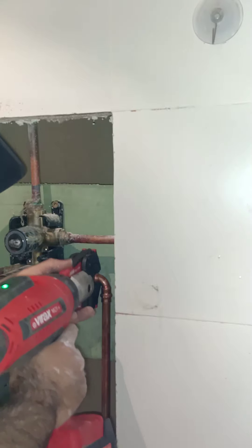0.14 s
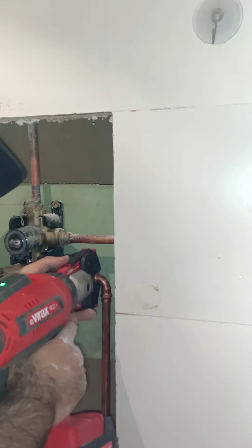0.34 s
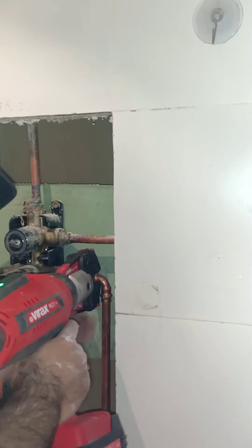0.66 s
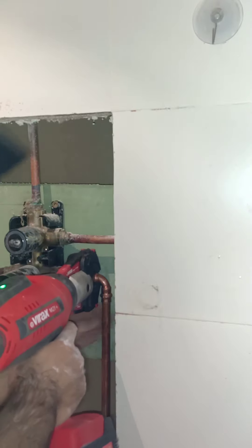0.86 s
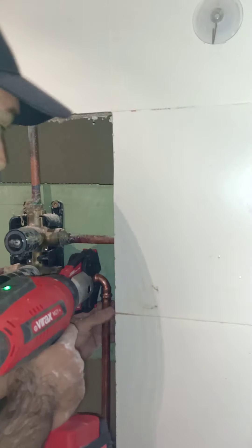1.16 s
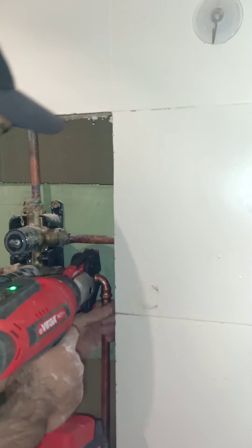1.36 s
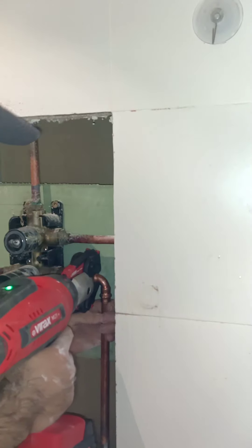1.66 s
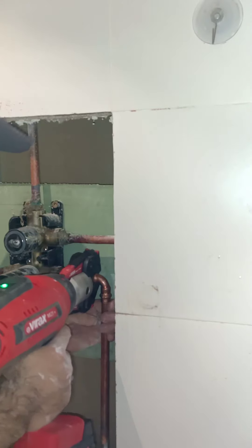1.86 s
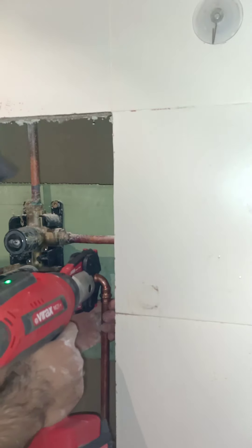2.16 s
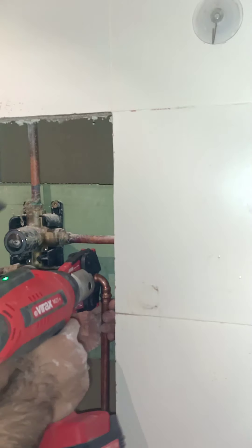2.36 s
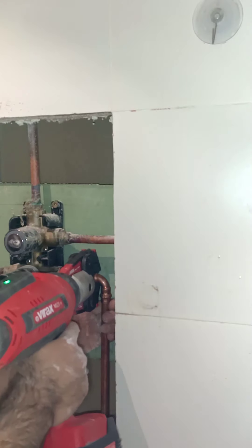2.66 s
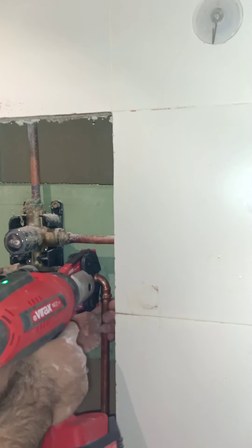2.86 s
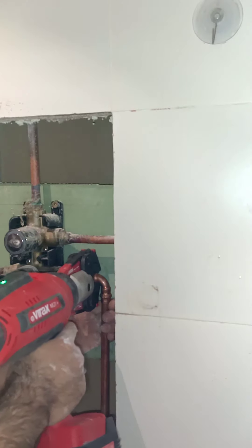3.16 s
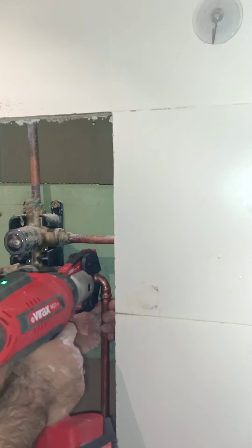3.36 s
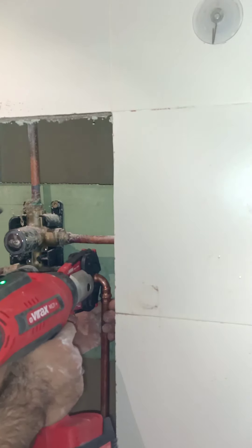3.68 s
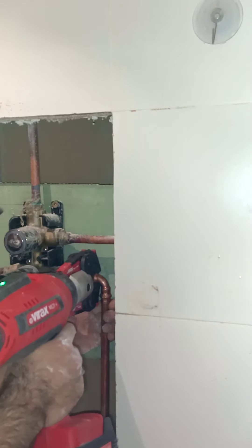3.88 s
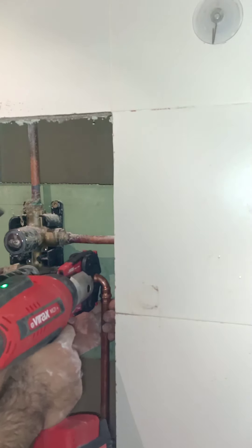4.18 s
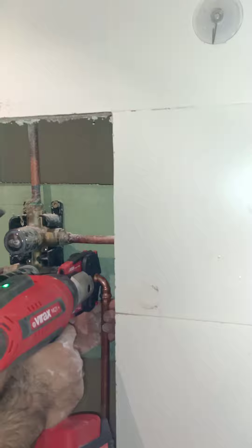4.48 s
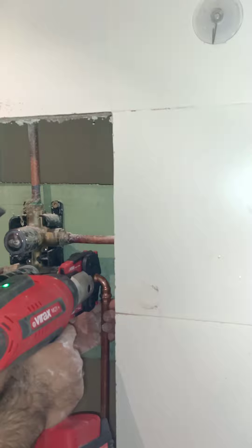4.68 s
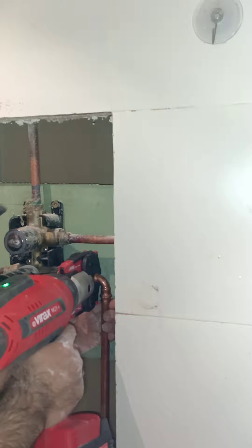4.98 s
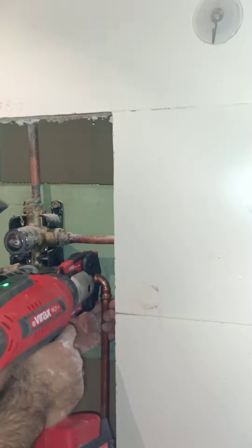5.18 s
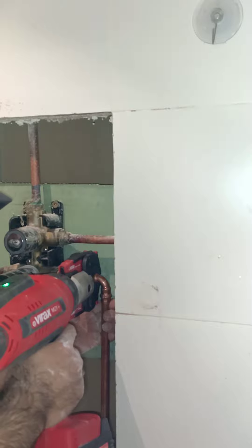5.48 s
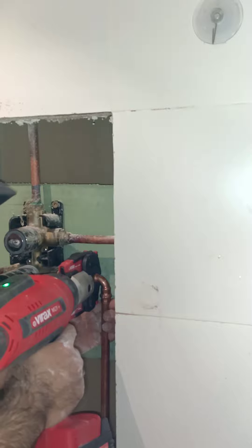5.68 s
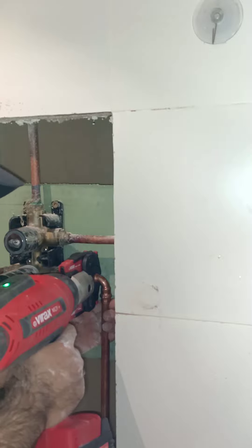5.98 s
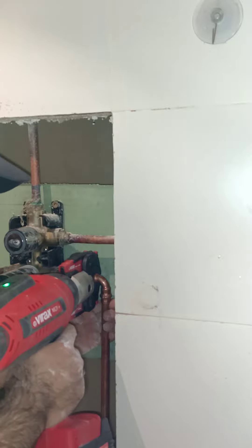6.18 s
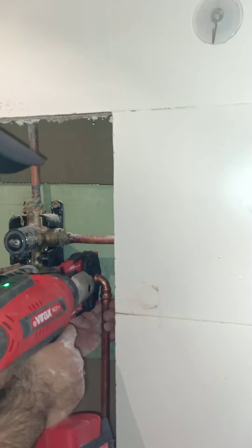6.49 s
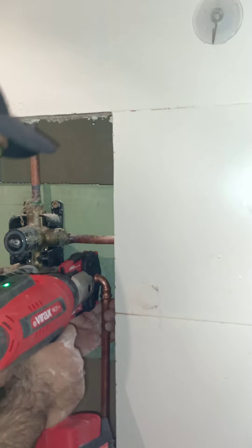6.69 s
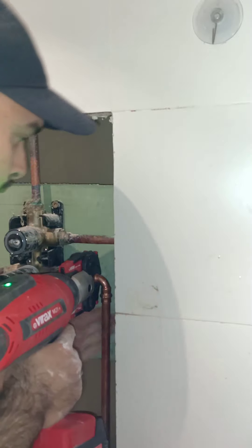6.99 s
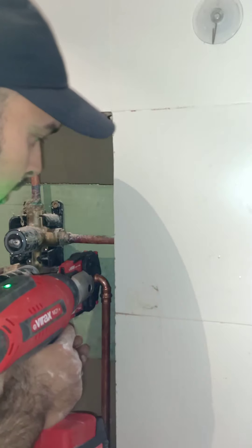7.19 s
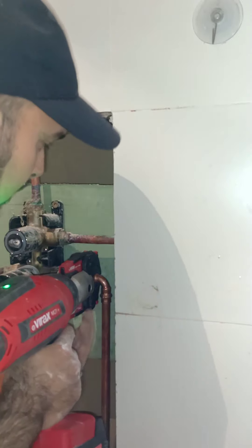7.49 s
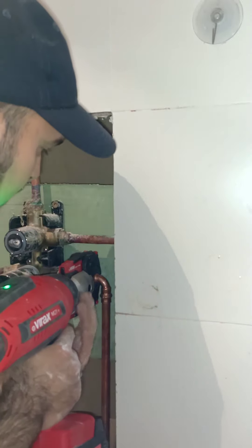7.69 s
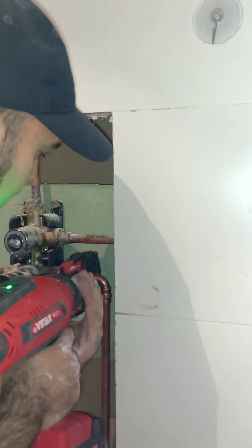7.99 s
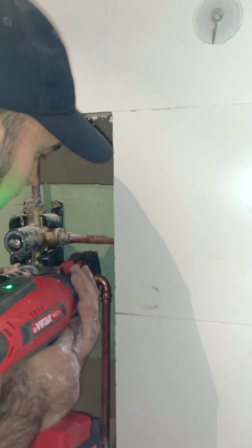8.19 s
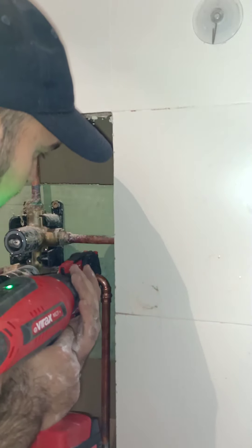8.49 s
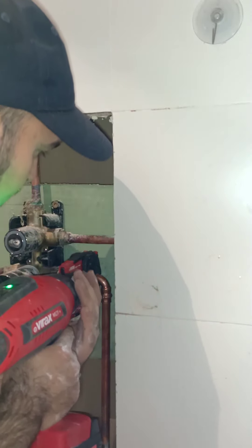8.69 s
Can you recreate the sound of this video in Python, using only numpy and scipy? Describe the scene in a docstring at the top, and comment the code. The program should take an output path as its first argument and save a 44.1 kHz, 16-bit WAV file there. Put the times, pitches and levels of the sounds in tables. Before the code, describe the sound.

For the first three seconds someone shifts about close to the microphone in a small tiled room, with quiet cloth rustle, scrapes, dull bumps and a few clicks from a tool's jaws. The strongest thump comes at about 1.3 seconds. At 2.9 seconds a trigger clicks and a battery press tool spins up to a loud, high whine over a rush of gears. From about 4 seconds the pitch sags and wavers as the jaws crimp a copper pipe fitting, and a low rumble carries through the wall. At 5.9 seconds the motor stalls for an instant, then reverses and quickly climbs back to a high whine. From about 7.3 seconds it slows to a lower whir with a thin steady tone, still running at the end, near 9 seconds.

```python
"""Battery press tool in a small tiled room

A phone stands close to the work. Hands and knees shuffle and bump, the jaws and trigger click, then the
motor spins up, sags as the jaws bite, stalls, runs back and slows. Rotor slots and gear teeth whine over
the rush of gears and brushes, and the tool's shake carries through pipe and wall."""
import sys
import numpy as np
from scipy import signal
from scipy.fft import rfft, irfft
from scipy.io import wavfile
from scipy.ndimage import uniform_filter1d

SR = 44100
rng = np.random.default_rng(int(sys.argv[2]) if len(sys.argv) > 2 else 0)


def generate_wav(sig):
    """Save sig (samples, or channels by samples) to the path in sys.argv[1] as 16-bit PCM at SR."""
    pcm = np.round(np.clip(np.atleast_2d(sig).T, -1, 1) * 32767).astype(np.int16)
    wavfile.write(sys.argv[1], SR, pcm)


N = 390285
TIME = np.arange(N) / SR

SLOTS = 15  # rotor slots
MESH_1, MESH_1B, MESH_2, MESH_SUM = 11.085, 11.67, 22.73, 33.8  # gear teeth met per shaft turn
START_S, UP_TO_SPEED_S, REVERSE_S = 2.915, 3.3, 5.92
FREE_HZ, RETURN_HZ = 4720, 4200  # slot tone with no load: forwards, running back
FULL_SAG = .28  # share of the speed lost at full load

# Spectrum of the room's background: frequency_hz, gain_db
ROOM_COLOUR = [(30, -14), (70, -7), (160, -13), (480, -28), (3200, -32), (4660, -12), (6000, -24),
               (7600, -38), (8500, -46), (13500, -46), (15000, -36)]
# Low resonances of the room: centre_hz, width_hz, gain_db
ROOM_MODES = [(290.7, 11, 13.5), (155, 10, 12.5), (217, 17, 14.5)]


def undb(db):
    """Decibels to gain."""
    return 10 ** (np.asarray(db) / 20)


def unit(x):
    """Scale to rms 1."""
    return x / np.sqrt(np.mean(x ** 2))


def noise(n=N):
    """White noise."""
    return rng.standard_normal(n)


def curves(table, off=-120):
    """Each column of a timed table as a curve, with the value `off` outside its span."""
    s, *columns = np.transpose(table)
    return [np.interp(TIME, s, c, off, off if s[-1] < TIME[-1] - .01 else c[-1]) for c in columns]


def bell(peak_s, half_s):
    """A smooth rise to 1 and fall around peak_s."""
    return np.exp(-((TIME - peak_s) / half_s) ** 2)


def swells(table):
    """A gain curve of overlapping bells."""
    return sum(undb(db) * bell(s, half_s) for s, db, half_s in table)


def response(f, points, peaks=()):
    """Gain in dB at frequency f: a line through the points plus resonance peaks."""
    point_hz, point_db = np.transpose(points)
    db = np.interp(np.log(f + 1), np.log(point_hz), point_db)
    return db + sum(gain / (1 + (2 * (f - hz) / width) ** 2) for hz, width, gain in peaks)


def colour(x, points, peaks=()):
    """Filter by a response and scale to rms 1."""
    gain = undb(response(np.fft.rfftfreq(N, 1 / SR), points, peaks))
    return unit(irfft(rfft(x) * gain, N))


def band(x, lo_hz, hi_hz):
    """Band-pass."""
    return signal.sosfilt(signal.butter(2, [lo_hz, hi_hz], "bandpass", fs=SR, output="sos"), x)


def walk(per_s):
    """Smooth random drift through per_s new values a second."""
    hold = int(SR / per_s)
    steps = np.repeat(rng.standard_normal(N // hold + 1), hold)
    return 1.32 * uniform_filter1d(uniform_filter1d(steps, hold), hold)[:N]


def add(out, start_s, x):
    """Mix x in at start_s."""
    i = int(start_s * SR)
    out[i:i + len(x)] += x[:N - i]


def room(x, wet_db, t60_s=0.35):
    """Direct sound plus echoes off the tiles; air and walls take their treble."""
    t = TIME[:SR // 2]
    echo = noise(len(t)) * 1000 ** (-t / t60_s) * (t > .003)
    echo = signal.sosfilt(signal.butter(2, 6500, fs=SR, output="sos"), echo)
    echo = echo / np.sqrt(np.sum(echo ** 2)) * undb(wet_db)
    echo[0] = 1
    return signal.fftconvolve(x, echo)[:N]


def room_tone(tool, halved_at_db=-45):
    """Faint background, which the phone's suppressor turns down as the tool gets loud."""
    background = colour(noise(), ROOM_COLOUR) * undb(-70 + 1.5 * walk(6))
    loudness = uniform_filter1d(abs(tool), SR // 10)
    return background / (1 + loudness / undb(halved_at_db))


def shuffle():
    """The worker settles near the phone: low rumble, scrapes, cloth and a creak."""
    # Body shifting: time_s, level_db
    shifts = [(0.0, -45.5), (0.18, -56.5), (0.74, -71.5), (1.41, -66), (1.78, -52), (2.1, -62), (2.43, -71),
              (2.92, -75)]
    # Shoes and tool scraping: peak_s, level_db, half_length_s
    scrapes = [(.03, -52.5, 0.1), (.3, -51.5, 0.055), (.97, -66.5, 0.11), (1.15, -64.5, 0.05),
               (1.33, -61, 0.053), (1.53, -63, 0.043), (1.79, -67, 0.17)]
    # Cloth rustling: peak_s, level_db, half_length_s
    rustles = [(0, -57.5, 0.078), (0.81, -76, 0.075), (0.973, -58, 0.074), (1.125, -56, 0.02),
               (1.173, -53.5, 0.03), (1.36, -62.5, 0.11), (1.6, -57, 0.12), (1.98, -55.5, 0.12),
               (2.14, -54, 0.14), (2.695, -71, 0.048)]
    # Spectrum of cloth at the microphone: frequency_hz, gain_db
    cloth_colour = [(880, -50), (1500, -25), (1690, -19), (2730, -19), (4650, -8), (6700, -15), (8100, -34),
                    (10000, -40), (12000, -48), (15600, -59), (22000, -120)]
    # Resonances in the rustle: centre_hz, width_hz, gain_db
    cloth_peaks = [(3250, 120, 8), (4610, 300, 6.5), (6240, 200, 4), (8490, 120, 9), (9600, 420, 13)]
    # One short creak: time_s, pitch_hz, level_db
    creak_path = [(.62, 404, -84), (.65, 410, -64), (.7, 435, -65), (.74, 425, -69), (.77, 398, -83)]
    rumble = unit(band(band(noise(), 40, 208), 35, 450)) * undb(curves(shifts)[0] + 2.6 * walk(25.4))
    scrape = unit(band(noise(), 290, 1350)) * swells(scrapes) * undb(1.5 * walk(40.3))
    cloth = colour(noise() * undb(1.1 * walk(120)), cloth_colour, cloth_peaks) * swells(rustles)
    creak_hz, creak_db = curves(creak_path)
    creak_phase = 2 * np.pi * np.cumsum(creak_hz) / SR
    creak = undb(creak_db + 3.7 * walk(41.5)) * np.sin(creak_phase + walk(60.3))
    return rumble + scrape + creak + cloth


def thumps():
    """Knees and tool bump floor and wall: a thud that sags in pitch, ringing modes and a rough tail."""
    # Soft blows: start_s, strength_db, pitch_hz, ring_t60_s
    blows = [(0.009, -30, 139.6, 0.54), (0.069, -34, 151.4, 0.38), (0.287, -29.5, 180, 0.43),
             (0.924, -38.5, 230, 0.28), (0.957, -32.5, 230, 0.22), (1.039, -41.5, 155, 0.48),
             (1.276, -18.5, 143.3, 0.31), (1.378, -32.5, 154, 0.43), (1.478, -40.5, 154, 0.53),
             (1.654, -27.5, 189.5, 0.67), (1.734, -29.5, 223, 0.69), (2.281, -44, 201, 0.22),
             (2.679, -44.5, 200, 0.56)]
    # Modes of floor and wall: pitch_hz, gain_db
    modes = [(82, -5), (156, 0), (215, 0), (243, -5), (270, -5.5), (296, -8), (350, -8.5), (441, -9.5),
             (497, -9), (641, -7.5), (780, -15), (870, -17), (975, -15)]
    octave_db, scatter_db = -6.5, 4  # modes far from a blow's pitch ring less; no two blows land alike
    out, t = np.zeros(N), TIME[:SR]
    phase_per_hz = 2 * np.pi * (t + 0.006 * (1 - np.exp(-t / 0.035)))
    attack = 1 - np.exp(-t / 0.0033)
    chances = rng.standard_normal((len(blows), len(modes)))
    for (start_s, db, hz, t60), scatter in zip(blows, chances):
        thud = 0.86 * np.sin(hz * phase_per_hz) * 1000 ** (-t / t60 / .45)
        ring = 0
        for (mode_hz, mode_db), chance in zip(modes, scatter):
            gain = undb(mode_db + octave_db * abs(np.log2(mode_hz / hz)) + scatter_db * chance)
            decay = 1000 ** (-t * (mode_hz / hz) ** 0.25 / t60)
            ring += gain * np.sin(mode_hz * (1 + .015 * chance) * phase_per_hz) * decay
        rough = unit(band(band(noise(SR), hz * 0.4, hz * 2.65), 50, 880))
        tail = 0.65 * rough * 1000 ** (-t / t60 / 1.19)
        add(out, start_s, 0.22 * undb(db) * (thud + ring + tail) * attack)
    return out


def clicks(top_hz=7700):
    """Jaws, latch and trigger snap, and a sliding hand ticks twice near 2 s; each is a short burst of noise
    around its own pitch."""
    # Snaps and ticks: start_s, peak_db, centre_hz, width_hz, decay_s
    snaps = [(0.235, -28, 3250, 5400, 0.0086), (0.535, -67, 2060, 500, .006),
             (1.097, -41.5, 7500, 7000, 0.004), (1.275, -35.5, 4660, 4400, 0.0097),
             (1.739, -48, 1460, 1400, 0.009), (1.931, -42, 4500, 5000, .0015),
             (2.052, -44, 4400, 1500, .002), (2.6584, -53, 5460, 3500, .004),
             (2.766, -54, 4350, 2960, 0.0045), (2.844, -34.5, 5150, 3240, 0.0083),
             (2.918, -22.5, 2120, 3180, 0.01)]
    out, t = np.zeros(N), TIME[:SR // 5]
    for start_s, db, hz, width_hz, decay_s in snaps:
        edges = max(hz - width_hz / 2, 700), hz + width_hz / 2
        burst = band(band(noise(len(t)) * np.exp(-t / decay_s), *edges), *edges)
        burst = signal.sosfilt(signal.butter(6, top_hz, fs=SR, output="sos"), burst)
        add(out, start_s, undb(db) * burst / abs(burst).max())
    return out


def wall_shake():
    """The running tool shakes pipe and wall: a deep rumble and a boom in the room's modes."""
    # Strength of the shake: time_s, deep_db, boom_db
    levels = [(2.92, -82, -72), (3.61, -84, -66), (4.3, -71, -51.5), (5.4, -69, -50.5), (6.1, -57, -45.5),
              (6.95, -60, -50), (7.9, -75, -49), (8.85, -76, -49)]
    deep_db, boom_db = curves(levels, off=-83)
    deep = unit(band(noise(), 47, 136)) * undb(deep_db + 1.2 * walk(6))
    wall = band(band(noise(), 131, 241), 135, 264)
    boom = colour(wall, ROOM_COLOUR, ROOM_MODES) * undb(boom_db + 2 * walk(3.66))
    return (deep + boom) * (TIME > START_S)


def speed_control(pitch_hz=1990):
    """The speed control chops the current: a thin tone that keeps its pitch at any motor speed."""
    # Strength of the tone: time_s, level_db
    levels = [(2.92, -55), (4, -53.5), (5.9, -45), (6, -42), (6.15, -48), (7.4, -49), (7.8, -37),
              (8.85, -35.5)]
    gain = undb(curves(levels)[0] + 1.8 * walk(20))
    return gain * np.sqrt(2) * np.sin(2 * np.pi * pitch_hz * TIME + .9 * walk(17))


def gear_rush(turns):
    """Gear noise and brush fizz pulse once a turn over a low growl, all heard through the housing."""
    # Strength of the rush, with growl and fizz relative to it: time_s, level_db, growl_db, fizz_db
    levels = [(2.915, -33.5, -22, -22), (3, -27, -10.5, -17), (3.1, -24.5, -10.5, -12),
              (3.27, -25.5, -11, -17), (4.2, -25, -10.5, -11), (4.6, -24.5, -10, -15),
              (5.885, -23, -11.5, -16), (5.905, -38, -3, -34), (5.94, -26.5, -1, -35),
              (5.97, -27.5, -2.5, -19), (6.1, -26.5, -6, -11), (6.41, -25.5, -7, -19), (7.27, -24, -9, -17),
              (7.7, -28, -8, -16), (8.85, -28, -9.5, -15)]
    # Spectrum of the rush: frequency_hz, gain_db
    spectrum = [(60, -44), (200, -13.5), (600, -11), (1400, -2), (2500, -5.5), (4700, 1), (6700, -2),
                (8400, -22), (12200, -27), (14000, -18), (15800, -16)]
    # Housing resonances and dips: centre_hz, width_hz, gain_db
    housing = [(1062, 71, 8.5), (1180, 230, -12), (1497, 27, 4.5), (1680, 197, -6.5), (4550, 620, 6),
               (5230, 470, 2.5), (10110, 1460, 8), (14950, 470, 14), (15750, 210, 13), (878, 51, 7),
               (926.5, 31, 7)]
    level_db, growl_db, fizz_db = curves(levels)
    beat = np.cos(2 * np.pi * turns)
    gears = colour(noise() * (1 + 0.16 * beat), spectrum, housing)
    # Brushes spark unevenly at the bars.
    sparks = noise() * (1 + .5 * beat) * undb(1.4 * walk(13) + 2.2 * walk(40) + 2.6 * walk(400))
    fizz = unit(band(colour(sparks, spectrum, housing), 6500, 18000))
    gear_bass = signal.sosfiltfilt(signal.butter(2, 1300, fs=SR, output="sos"), gears)
    rush = unit(band(gears - gear_bass, 250, 10640))
    growl = unit(band(band(colour(noise(), spectrum, housing), 227, 1540), 230, 4800))
    mix = rush * undb(1.2 * walk(12)) + growl * undb(growl_db + walk(10)) + fizz * undb(fizz_db)
    return mix * undb(level_db)


def rotor():
    """The rotor trembles more under strain. Returns slot pitch, strain (0 to 1) and shaft turns."""
    # Motor speed, heard as the slot tone: time_s, pitch_hz
    speed = [(2.92, 804), (2.96, 1276), (3.0, 1990), (3.1, 2846), (3.15, 3716), (3.2, 4220), (3.26, 4520),
             (3.36, 4673), (3.6, 4724), (3.92, 4710), (4.15, 4412), (4.4, 4187), (4.57, 3416), (4.68, 3375),
             (4.87, 3200), (5.1, 3576), (5.25, 3786), (5.33, 3668), (5.42, 3730), (5.57, 3650),
             (5.67, 3480), (5.76, 3530), (5.862, 3427), (5.89, 2352), (5.92, 394.5), (5.96, 2453),
             (6.11, 3314), (6.15, 3855), (6.2, 4110), (6.28, 4350), (6.62, 4386), (6.67, 4326),
             (6.85, 4317), (6.97, 4250), (7.15, 4238), (7.31, 4260), (7.47, 3452), (7.57, 3057),
             (7.7, 2717), (7.8, 2510), (7.97, 2372), (8.3, 2293), (8.85, 2367)]
    slot_hz = curves(speed, off=0)[0]
    strain = np.clip((1 - slot_hz / FREE_HZ) / FULL_SAG, 0, 1) * (TIME < REVERSE_S)
    trembling_hz = slot_hz * (1 + (.0015 + .004 * strain) * walk(45))
    return slot_hz, strain, np.cumsum(trembling_hz) / SLOTS / SR


def whine(slot_hz, strain, turns):
    """Slot and gear tones locked to the shaft; their levels follow the load and the resonances crossed."""
    # Tones: cycles_per_turn, press_db, return_db, full_load_gain_db, waver_db, flicker_db, play_rad
    tones = [(1, -31.5, -27.5, 1, 3, 1.5, 0.23), (5, -31, -22, -0.5, 0.3, 1.5, 0.43),
             (10, -35.5, -49, -5, 0.5, 3.5, -0.1), (SLOTS, -29, -27.5, 0.5, 0.41, 1.8, 0.19),
             (2 * SLOTS, -45, -35.5, -1, 0.91, 2.3, 0.1499), (40, -54, -45.5, 1, 5.5, 6, -0.3),
             (3 * SLOTS, -45, -39, 0, 2, 2, .2), (MESH_1, -33, -38.5, 13.1, 1.5, 2.2, 0.28),
             (MESH_1B, -41.5, -47, 13, 3, 3, 0.63), (2 * MESH_1, -35.5, -43, 4.6, 1.2, 2.5, 0.45),
             (MESH_2, -30.5, -38, 3.3, 1, 2, 0.45), (2 * MESH_1B, -48.5, -50.5, 4, 3, 9.4, 0.84),
             (MESH_SUM, -47, -47.5, 1.5, 2.6, 4.2, 0.37)]
    # Way through housing and air to the microphone: frequency_hz, gain_db
    path = [(150, -31), (230, -41), (320, -27), (760, -37), (900, -20), (1060, -15), (1190, -22),
            (1400, -10.5), (2000, -11), (2600, -8.5), (3300, -7.5), (3750, -3.5), (4100, -2.5), (4650, 1.5),
            (5000, -1.5), (5600, -4.5), (7000, -9.5), (8450, -14), (8900, -27), (14000, -27)]
    # Swells and dips of single tones: peak_s, cycles_per_turn, gain_db, half_length_s
    accents = [(3, 1, -16, .12), (2.96, MESH_1, 10, .03), (3.062, MESH_1, 8, 0.045),
               (3.08, MESH_2, -11, 0.066), (3.08, 2 * MESH_1, -8, .07), (3.04, SLOTS, -7, .06),
               (3.15, SLOTS, 4, 0.017), (3.23, MESH_1, -8, .045), (3.24, MESH_1B, -15, .1),
               (3.2, MESH_2, 8.5, 0.026), (3.26, SLOTS, 9, 0.043), (3.362, SLOTS, 10.5, 0.024),
               (3.457, SLOTS, 8.5, 0.026), (3.9, SLOTS, 8, 0.035), (3.7, SLOTS, 8.5, .015),
               (4.1, 2 * MESH_1, 8, 0.19), (4.37, MESH_2, 4, 0.17), (4.1, SLOTS, 5.5, 0.12),
               (4.201, MESH_1, 11.5, 0.061), (4.43, MESH_1, 7.5, 0.062), (4.5, SLOTS, 1, 0.037),
               (4.9, SLOTS, -9, 0.076), (5.169, SLOTS, 9, .04), (5.353, SLOTS, 7, 0.089),
               (5.35, 2 * SLOTS, 9, 0.14), (5.5, MESH_1, 4.5, 0.11), (4.8, MESH_2, 1, .15),
               (5.77, MESH_2, 2, .08), (5.7, SLOTS, -5, 0.047), (5.885, MESH_2, -2, 0.019),
               (5.887, 2 * MESH_1, -7, 0.018), (5.884, 2 * MESH_1B, -8, .02), (5.875, MESH_1, 9, .01),
               (5.9, MESH_1, -25, 0.011), (6.07, MESH_2, -5, .07), (6.09, 5, 5, .06),
               (6.16, SLOTS, 6, 0.059), (6.36, 1, 3, 0.34), (6.5, SLOTS, 6.5, 0.12),
               (6.85, SLOTS, -11, 0.025), (7.15, 2 * SLOTS, 5.5, .2), (7.47, MESH_2, 5, .1),
               (7.68, MESH_2, 6, 0.14), (7.66, 5, 5, 0.14), (7.4, 5, -6.5, 0.11),
               (7.75, 2 * SLOTS, -11, 0.22), (8.5, 2 * SLOTS, -4.5, .5), (8.2, MESH_2, -5, 0.6),
               (8.5, 2 * MESH_1, 10.5, 0.54), (8.23, MESH_1, 7.5, 0.57), (7.25, 1, -8, .25),
               (8.05, 1, -6, 0.14), (8.4, MESH_SUM, 8.5, 0.49), (7.6, 2 * MESH_1, 7, 0.074)]
    back = TIME > REVERSE_S  # running back, the gears bear on their other flanks
    load = np.minimum(strain, np.where(TIME < UP_TO_SPEED_S, 0.37, 1))  # partial during the run-up
    stall_db = -32 * bell(REVERSE_S, 0.018) - 120 * (slot_hz < 1)  # tones die at reversal and at rest
    rattle = 1 + uniform_filter1d(abs(np.gradient(slot_hz)) * SR, 2000) / 2500
    out = 0
    for per_turn, press_db, return_db, load_db, waver_db, flicker_db, play in tones:
        if per_turn > 20 and per_turn % 1:  # teeth rattle in their play while the speed changes
            play = play * np.minimum(1.6 * rattle - .6, 6) * (1 + .4 * load)
        if per_turn == MESH_1:  # the unloaded flank chatters
            play = play * (1 + 2 * back)
        db = np.where(back, return_db, press_db) + load_db * load + stall_db
        db += response(per_turn * slot_hz / SLOTS, path, ROOM_MODES)
        db += sum(gain * bell(s, half_s) for s, tone, gain, half_s in accents if tone == per_turn)
        if per_turn > 2 * SLOTS and per_turn % 1 == 0:  # high overtones fade as the return slows
            db -= 110 * back * np.clip(1 - slot_hz / RETURN_HZ, 0, 1)
        db += waver_db * walk(9) + flicker_db * walk(42)
        out += undb(db) * np.sqrt(2) * np.sin(2 * np.pi * per_turn * turns + play * walk(250))
    return out


def scene():
    """Tool, worker and room at one close microphone, the same on both channels."""
    slot_hz, strain, turns = rotor()
    rush = room(gear_rush(turns) + wall_shake(), wet_db=-6.5) * undb(-2.5)
    tones = room(whine(slot_hz, strain, turns) + speed_control(), wet_db=-12)
    tool = rush + tones
    handling = room(clicks(), wet_db=-5) + thumps() + shuffle()
    return np.tile(tool + handling + room_tone(tool), (2, 1))


def record(dry):
    """The phone cuts off steeply above 15750 Hz."""
    return signal.sosfilt(signal.ellip(10, .2, 80, 15750, fs=SR, output="sos"), dry)


dry = scene()
out = record(dry)
generate_wav(out)
```